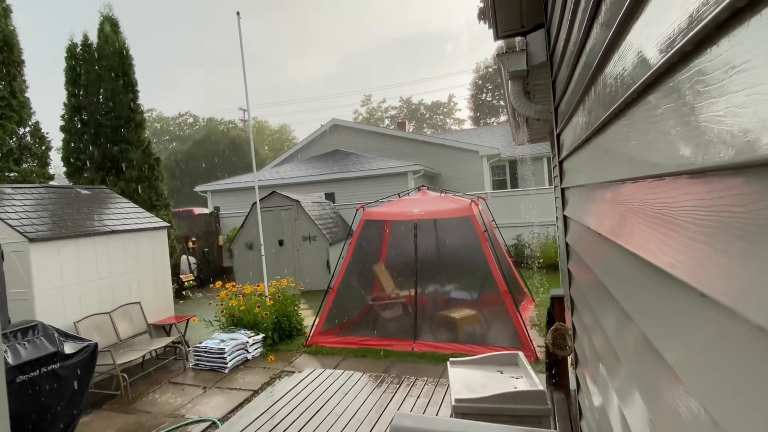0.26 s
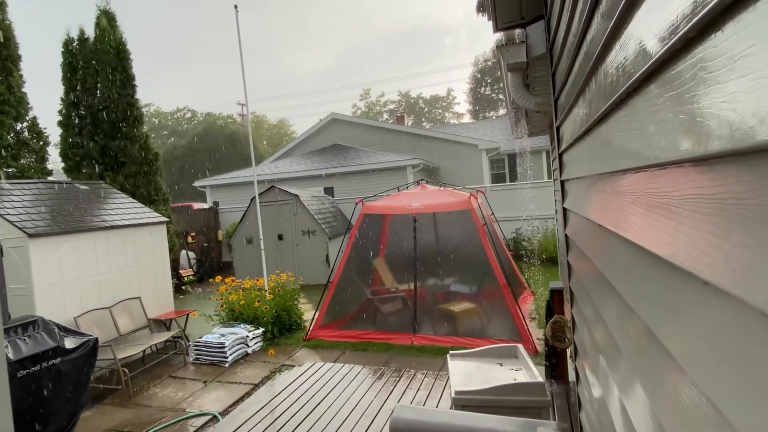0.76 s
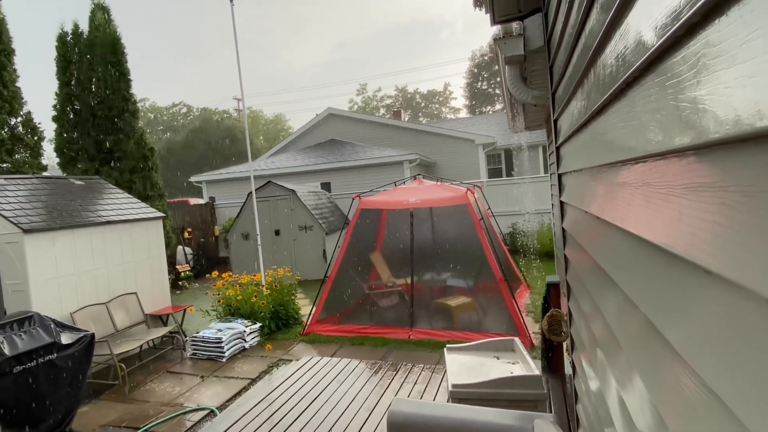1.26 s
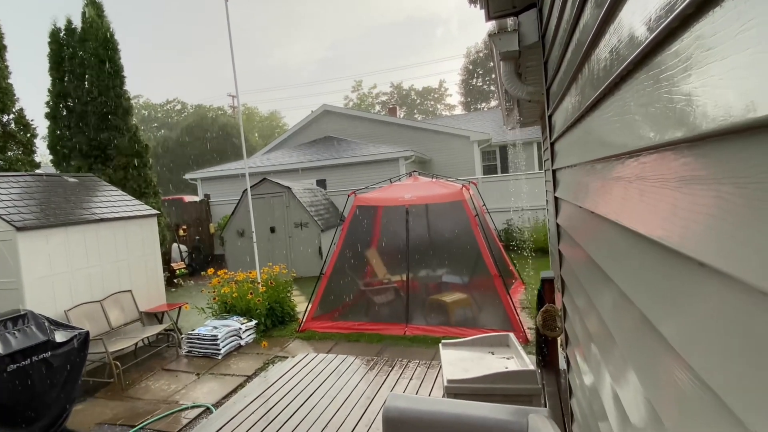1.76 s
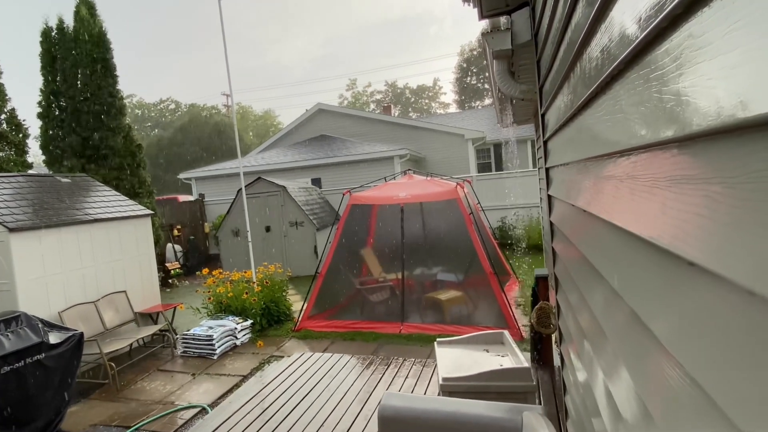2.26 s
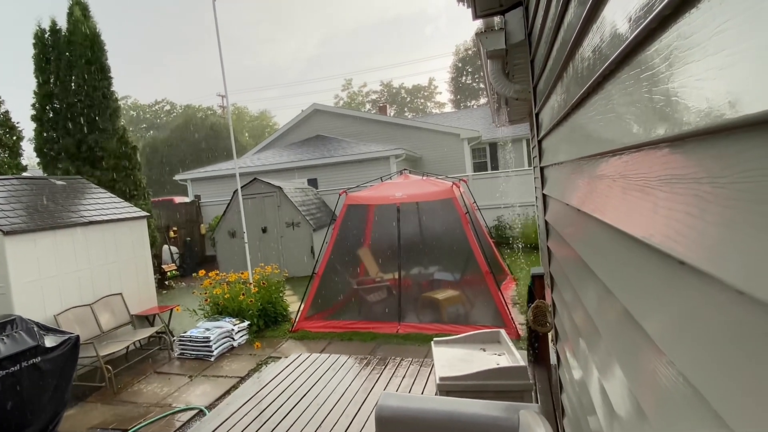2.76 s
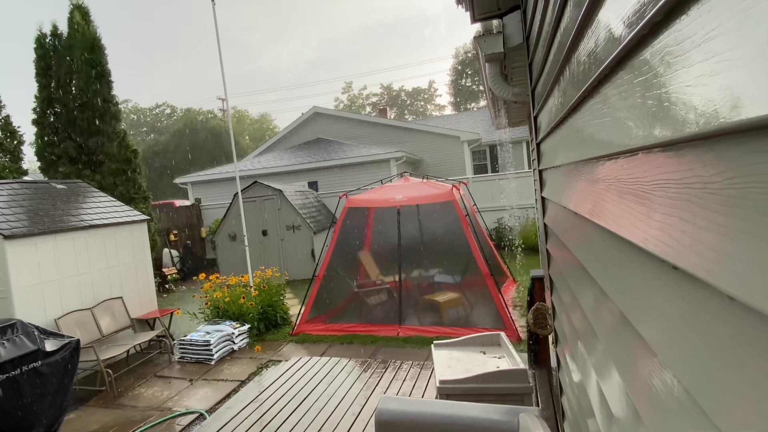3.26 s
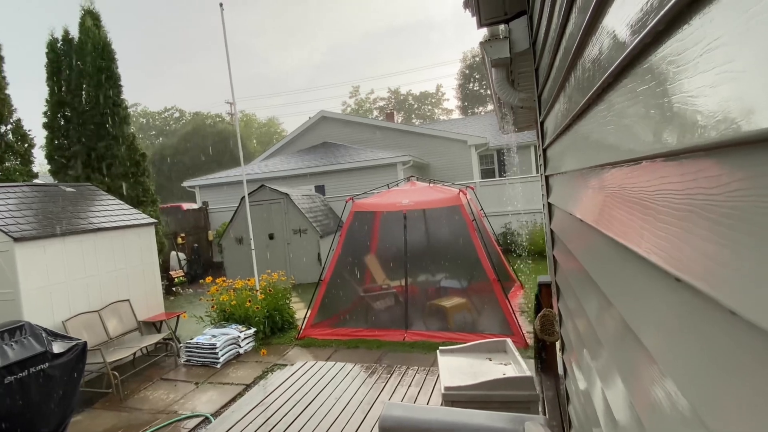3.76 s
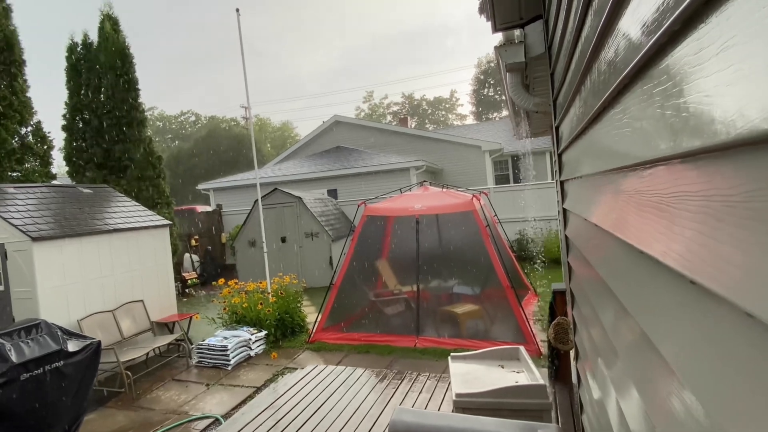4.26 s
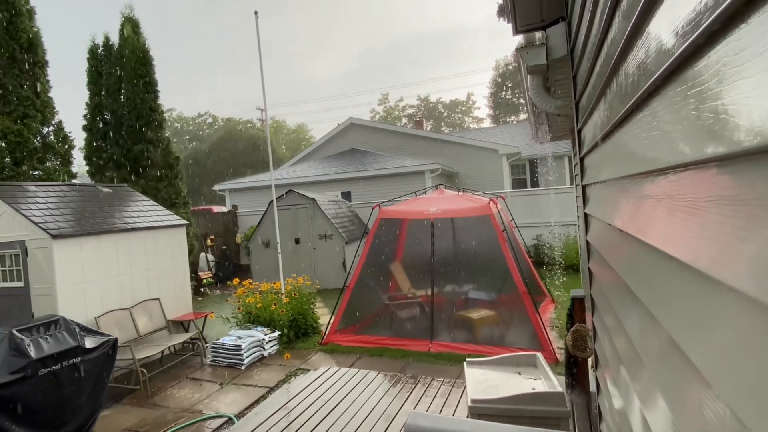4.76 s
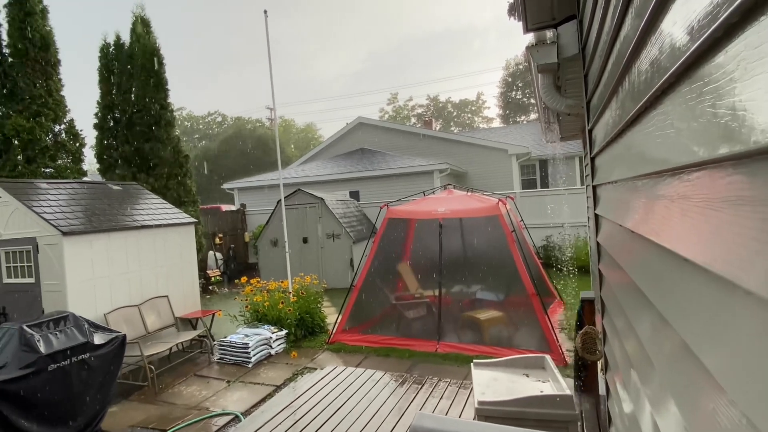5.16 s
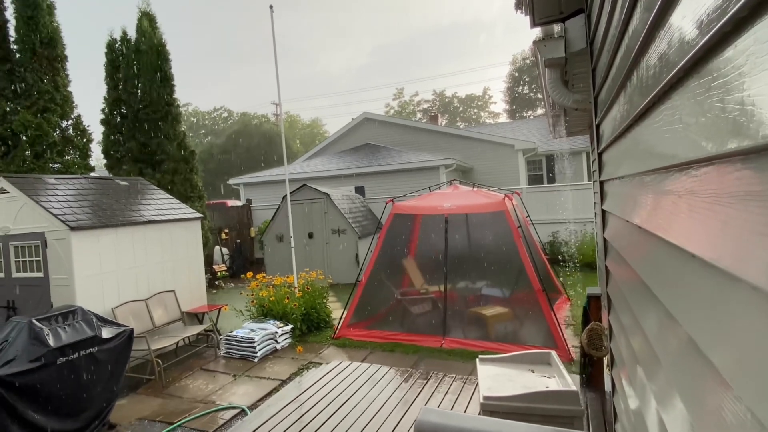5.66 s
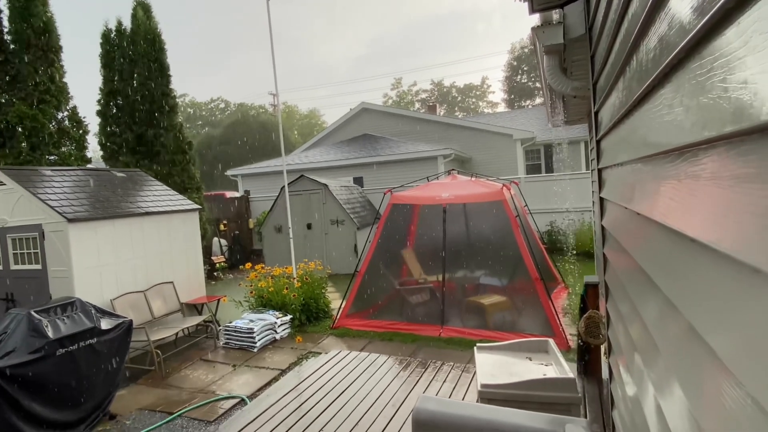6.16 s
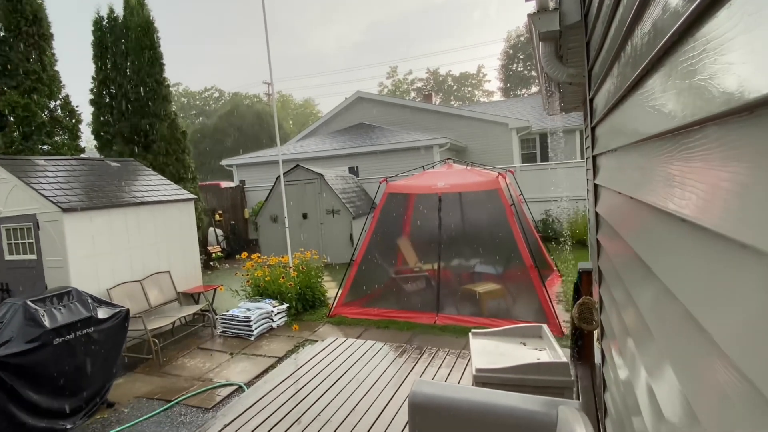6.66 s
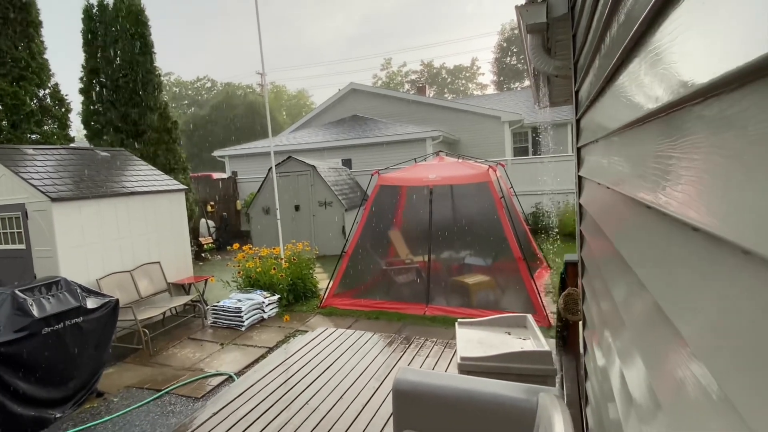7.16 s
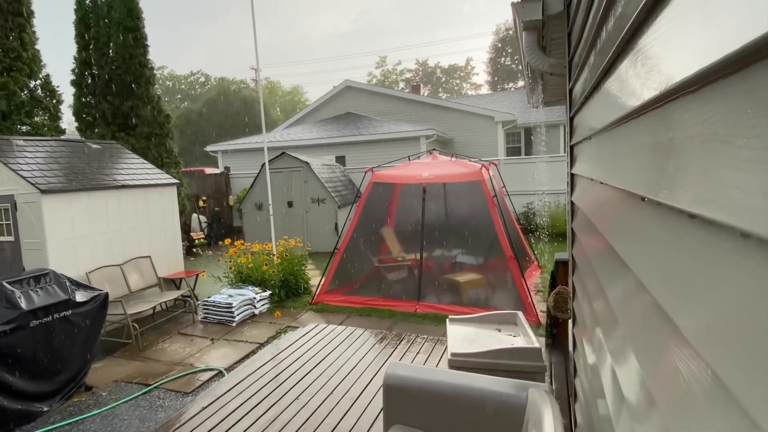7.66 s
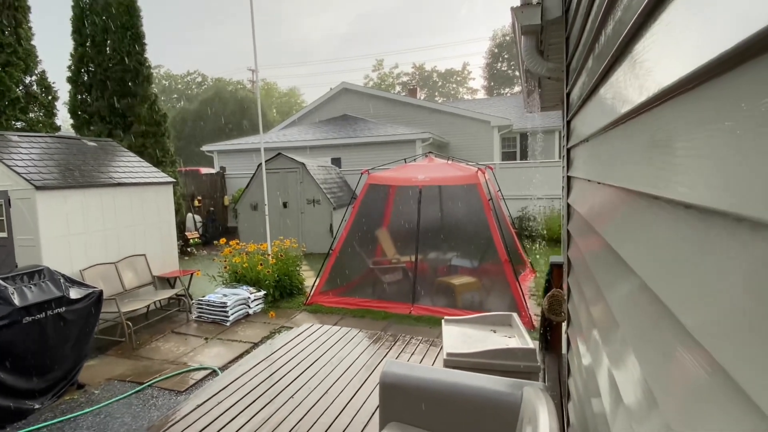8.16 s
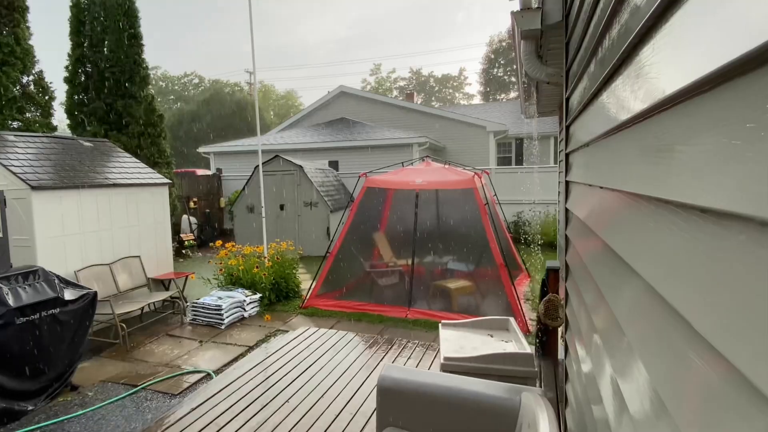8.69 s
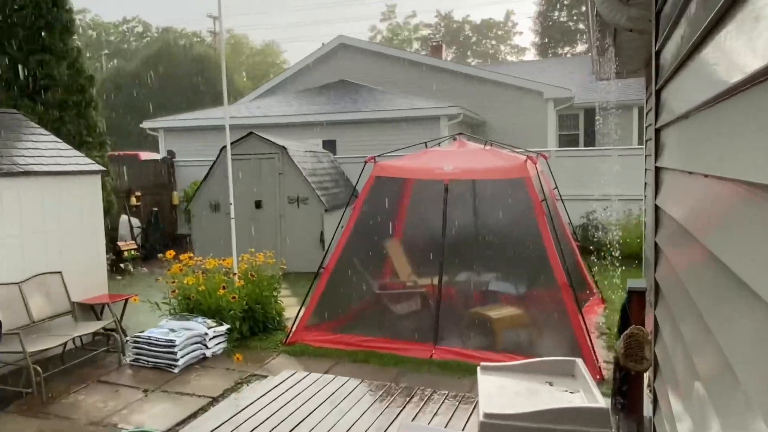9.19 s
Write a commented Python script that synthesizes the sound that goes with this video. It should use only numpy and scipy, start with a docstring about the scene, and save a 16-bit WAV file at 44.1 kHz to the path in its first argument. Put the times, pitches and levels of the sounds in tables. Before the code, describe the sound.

Bright steady rain with a low fan hum; a door latch clacks, the door opens to full wide rain, then the sound abruptly thins.

```python
"""Heavy rain from two microphones laid over each other: one in a yard, one in stereo in a room.
Throughout: bright mono rain (band noise with splash flares), faint tones and, panned, the cracks of big drops.
From the start, in the room: a fan (beating sines over air noise) and hand rumble. A door is gripped
(ringing blows, low thuds), unlatched near 2.4 s and swung open from 2.9 to 4 s onto wide, full rain.
At 7.2 s the room sound is cut off abruptly; yard rain and big drops go on."""
import sys
import numpy as np
from scipy import signal
from scipy.fft import rfft, irfft, next_fast_len
from scipy.io import wavfile
from scipy.ndimage import uniform_filter1d

SR = 44100
rng = np.random.default_rng(int(sys.argv[2]) if len(sys.argv) > 2 else 0)


def wav_out(sig):
    """Save sig, one row per channel (or a flat mono array), as 16-bit PCM at SR to the path in sys.argv[1]."""
    wavfile.write(sys.argv[1], SR, np.round(np.clip(np.atleast_2d(sig).T, -1, 1) * 32767).astype(np.int16))


N = 415863
T_S = np.arange(N) / SR
SWING_START_S, SWING_END_S = 2.925, 3.97


def undb(db):
    """Decibels to an amplitude factor."""
    return 10 ** (np.asarray(db) / 20)


def curve(rows):
    """Interpolates (t/s, level/dB) rows to one level a sample."""
    time_s, level_db = np.transpose(rows)
    return np.interp(T_S, time_s, level_db)


def colour(x, points, peaks=()):
    """Shapes flat sound to a spectrum, linear in log f, plus resonances; rms 1."""
    size = next_fast_len(N)
    f_hz = np.fft.rfftfreq(size, 1 / SR)
    point_hz, point_db = np.transpose(points)
    shape_db = np.interp(np.log(f_hz + 1), np.log(point_hz), point_db)
    for mid_hz, width_hz, peak_db in peaks:
        shape_db = shape_db + peak_db * 2 ** -(2 * (f_hz - mid_hz) / width_hz) ** 2
    y = irfft(rfft(x, size) * undb(shape_db), size)[:N]
    return y / y.std()


def walk(rate_hz):
    """Random levels held 1 / rate_hz and slewed twice; spread near 1."""
    hold = int(SR / rate_hz)
    steps = np.repeat(rng.standard_normal(N // hold + 1), hold)
    smooth = uniform_filter1d(uniform_filter1d(steps, hold), hold)
    return np.sqrt(2) * smooth[:N]


def add(out, x, start_s, pan_db):
    """Mixes in a short sound; pan_db is left minus right."""
    i = int(start_s * SR)
    out[:, i:i + x.shape[-1]] += x * undb(np.array([[pan_db], [-pan_db]]) / 2)


def patter(per_s, near_db, spread_db, splash_s, flicker_db, count):
    """Flat noise of countless far drops; nearer splashes flare up over a few neighbouring octave bands."""
    size = next_fast_len(N)
    octave = np.log2(np.fft.rfftfreq(size, 1 / SR) / 250 + 1e-9).clip(0, 6)
    noise = rfft(rng.standard_normal((count, size)))
    when, big, place = rng.random((4000, 3)).T
    heard = np.arange(4000) < per_s * N / SR
    splash = heard * undb(near_db + spread_db * big ** 2)
    fall = np.exp(-1 / (splash_s * SR))
    out = 0
    for k in range(7):
        # most splashes sit in the treble: small drops
        share = np.exp(-((k - 6.3 + 3.2 * place ** 0.59) / 1.2) ** 2)
        onsets = np.bincount((when * N).astype(int), splash * share, N)
        flare = signal.lfilter([1], [1, -fall], onsets)
        swell = undb(flicker_db * k / 6 * walk(14)) + flare  # flicker grows from none in the lowest band
        band = irfft(noise * (1 - np.abs(octave - k)).clip(0), size)[:, :N]
        out = out + swell * band
    return out


def gap():
    """How far the door stands open, 0 to 1, linear in time."""
    return np.interp(T_S, (SWING_START_S, SWING_END_S), (0, 1))


def fan():
    """Motor lines that throb by beating with close neighbours and waver, over a rumble of air."""
    # air spectrum, common to both ears: f/Hz, relative density/dB
    air_mid = [(20, -48), (40, -10.5), (60, -4.5), (80, -3.5), (100, -7), (180, -6.5), (230, -10.5),
               (300, -12.5), (340, -20), (800, -22.5), (2000, -25), (5000, -75)]
    # air spectrum, opposite in the ears: f/Hz, relative density/dB
    air_side = [(18, -41), (30, -15), (62, -10), (209, -17), (359, -5), (433, -15), (475, -11),
                (848, -16.5), (1760, -13), (2600, -27), (3380, -73), (5720, -120)]
    # air, common part: t/s, rms level/dB
    air_level = [(0, -47), (2, -48.5), (3.4, -44), (7.3, -50.5)]
    # motor lines: f/Hz, rms level door shut/dB, neighbour offset/Hz, neighbour re line/dB,
    # both in step at t/s, change with door open/dB
    motor_lines = [(58.6, -52, .55, -1, 1.25, -4), (118.32, -52, 1.62, -2, .34, -2.5),
                   (178.76, -49.5, .89, -7, .47, -6)]
    mid = colour(rng.standard_normal(N), air_mid)
    side = undb(-5.5) * colour(rng.standard_normal(N), air_side)
    out = undb(curve(air_level)) * np.array([mid + side, mid - side])
    for hz, db, beat_hz, near_db, step_s, open_db in motor_lines:
        phase = 2 * np.pi * (hz * T_S + rng.random())
        neighbour = undb(near_db) * np.sin(phase + 2 * np.pi * beat_hz * (T_S - step_s))
        level_db = db + open_db * gap() + 0.6 * walk(6.5)
        out = out + np.sqrt(2) * undb(level_db) * (np.sin(phase) + neighbour)
    return out


def hand():
    """The hand shifts on the housing: swells of 45-130 Hz rumble, unrelated left and right."""
    # shifts: centre t/s, rms level at the height/dB, length between 1/e points/s
    shifts = [(0.083, -45, 0.2), (0.307, -46, 0.081), (0.468, -50, 0.13), (.95, -57, .3),
              (1.337, -45, 0.093), (2.45, -43, 0.15), (3.08, -56, 0.43), (3.78, -43, 0.26),
              (4.15, -53, .12), (4.5, -53, .12)]
    band = signal.butter(2, [45, 130], "bandpass", fs=SR, output="sos")
    rumble = signal.sosfilt(band, rng.standard_normal((2, N)))
    swell = sum(undb(db) * np.exp(-(2 * (T_S - s) / length_s) ** 2) for s, db, length_s in shifts)
    return rumble / rumble.std() * swell


def yard():
    """Thin, bright rain coloured by the microphone housing, and faint tones; the same in both ears."""
    # rain spectrum ahead of the housing: f/Hz, relative density/dB
    yard_spectrum = [(30, -50), (55, -15), (90, -23), (160, -14.5), (430, -16), (780, -17.5), (1500, -14.5),
                     (1850, -10), (2500, -5.5), (4500, -4.5), (6100, -12), (8800, -7.5), (9600, -18),
                     (11500, -22.5), (15800, -28)]
    # rain: t/s, rms level/dB
    yard_level = [(0, -43.5), (3, -43.5), (7.2, -40), (7.6, -42.5), (9.43, -42.5)]
    # housing resonances: f/Hz, width/Hz, gain/dB (a dip is negative)
    housing = [(585, 210, 6), (1036, 376, 13), (3250, 650, 5), (4010, 230, -2.5), (6780, 450, -8.5),
               (7520, 940, 4), (8460, 490, 3.5), (10410, 420, 7), (12800, 800, 7.5), (14250, 250, -8),
               (14600, 260, 0)]
    # faint steady tones: f/Hz, rms level/dB
    yard_tones = [(59.2, -74), (107.7, -79)]
    far_and_near = patter(60, -10.5, 13.0, 0.0037, 0.69, count=1)[0]
    rain = colour(far_and_near, yard_spectrum, housing) * undb(curve(yard_level))
    tones = sum(np.sqrt(2) * undb(db) * np.sin(2 * np.pi * hz * T_S) for hz, db in yard_tones)
    return rain + tones


def door():
    """Short rattles ring the latch metal; the leaf swells into low decaying thuds in its frame."""
    # latch and handle modes: f/Hz, level/dB ahead of the blow's tilt, t60/s
    latch_modes = [(298, -10, 0.034), (430, 0, 0.026), (1130, 1, 0.022), (1420, 9.5, 0.0083),
                   (1800, 8.5, 0.0084), (2350, 8, 0.017), (2700, 5, 0.017), (3020, 7, 0.0092),
                   (4080, -1.5, 0.011), (5210, -3, 0.0094), (6840, 6, 0.0079), (7750, 3, 0.0016),
                   (10800, -24, 0.011)]
    # blows: t/s, peak level ahead of panning/dB, brightness/(dB per octave re 2 kHz), rattle time/s
    blows = [(.272, -35.5, -15, .006), (2.213, -29.5, -10, 0.0078), (2.348, -32.5, -12, 0.0044),
             (2.396, -16, 4, 0.0006), (2.397, -21.5, -2, .0035), (2.408, -12, 6, 0.0055),
             (2.424, -18, -3, 0.0055), (2.443, -16, 0, 0.0057), (2.46, -28, -5, 0.012),
             (3.042, -21, -1, 0.0028), (3.049, -27, -3, 0.012)]
    # leaf thuds: t/s, peak level ahead of panning/dB, f/Hz
    thuds = [(.028, -35.5, 272), (0.275, -43, 255), (2.041, -32.5, 129), (2.217, -31.5, 132),
             (2.24, -24.5, 95.6), (2.362, -32, 88), (2.391, -19, 103.7), (2.399, -26.5, 227),
             (2.41, -22, 57.6), (2.433, -39, 195), (3.047, -33, 220)]
    rise_cycles, t60_cycles = 0.38, 13.7  # thud
    out, t = np.zeros((2, N)), np.arange(8000) / SR
    for s, db, bright_db, rattle_s in blows:
        ring = np.zeros(8000)
        for hz, mode_db, t60_s in latch_modes:
            mode_gain = undb(mode_db + bright_db * np.log2(hz / 2000))
            ring += mode_gain * np.sin(2 * np.pi * hz * t) * 1000 ** (-t / t60_s)
        # bare contact noise: 17 dB at a 1 ms rattle; longer rattles ring more
        crack_db = 17 - 5.5 * np.log2(rattle_s * 1000)
        contact = np.clip(.5 - bright_db / 9, 0, .9)  # dull blows touch longer
        ring[:8] += undb(crack_db) * contact ** np.arange(8)
        rattle = rng.standard_normal((3, 8000)) * t * np.exp(-t / rattle_s)
        # one shared rattle, one for each ear
        ears = rattle[0] + 1.9 * rattle[1:]
        hit = signal.fftconvolve(ears, ring[None], axes=1)[:, :8000]
        add(out, undb(db) * hit / np.abs(hit).max(), s, pan_db=2.2)
    for s, db, hz in thuds:
        rise = (1 - np.exp(-hz * t / rise_cycles)) ** 2
        thud = rise * 1000 ** (-hz * t / t60_cycles) * np.sin(2 * np.pi * hz * t)
        add(out, undb(db) * thud / np.abs(thud).max(), s, pan_db=.6)
    return out


def drops():
    """Each big drop close by is a tick, a crack of noise and weak spray, all in its own band."""
    # big drops: t/s, peak level ahead of panning/dB, lowest f/Hz, highest f/Hz, left minus right/dB
    big_drops = [(0.092, -36, 5200, 9500, 2), (1.747, -30, 7400, 9800, 1), (1.956, -28.5, 3650, 5500, 5),
                 (2.860, -23, 3000, 10300, 0), (2.920, -25, 3500, 9400, -0.5), (3.511, -30, 3000, 11600, 5),
                 (3.844, -25, 2400, 4600, 13), (4.083, -31, 9300, 15500, 0), (4.092, -26, 2500, 4970, 10),
                 (4.261, -27, 6400, 12500, -2), (4.482, -34, 6600, 15500, -2), (4.5, -29, 5000, 7500, 1),
                 (4.722, -33, 7700, 15500, -4), (4.803, -33, 5200, 14800, 1), (4.828, -27, 2300, 6000, -2),
                 (4.867, -29, 2180, 4400, 12), (4.925, -30, 7800, 11900, -4), (5.023, -28, 5000, 8000, 0),
                 (5.095, -33, 3800, 9700, -3), (5.215, -27, 4100, 6370, -6), (5.537, -35, 2300, 6300, 7),
                 (5.564, -31, 4500, 5600, 0), (5.578, -26, 4300, 7500, 0), (5.638, -29, 6600, 9600, 1),
                 (5.682, -24, 3000, 12500, 4), (5.718, -31, 4100, 15500, 2), (5.843, -24, 4200, 7200, -7),
                 (6.035, -26.5, 6100, 11600, -7), (6.167, -21.5, 4200, 6560, -5),
                 (6.191, -27, 4700, 15500, -7), (6.267, -32, 9600, 15500, -1), (6.294, -24, 4700, 9700, -3),
                 (6.338, -25, 5300, 8900, -6), (6.476, -29, 6890, 9700, 0), (6.528, -32, 9100, 13500, -2),
                 (6.547, -25, 2200, 5500, 0), (6.593, -32, 9900, 13500, 0), (6.743, -30, 9600, 15300, 0),
                 (6.773, -26, 3800, 6500, 0), (6.831, -23.5, 4200, 11600, 1),
                 (6.954, -27.5, 7000, 10100, 0), (7.518, -36, 6700, 9300, 0), (7.831, -35, 4400, 9300, 0),
                 (8.225, -28, 3600, 7000, 0), (8.374, -32, 2800, 9300, 0), (8.992, -35, 3300, 9900, 0),
                 (9.183, -29.5, 7400, 9300, 0), (9.207, -25, 2490, 5130, 0), (9.258, -30, 7200, 9600, 0)]
    rise_s, crack_t60_s = .0003, .012
    spray_db, spray_t60_s, tick_db = -15, .12, 9
    out, t = np.zeros((2, N)), np.arange(2000) / SR
    spray = undb(spray_db) * 1000 ** (-t / spray_t60_s)  # droplets falling back
    tick = undb(tick_db) * (t == 0)  # first contact
    envelope = np.minimum(t / rise_s, 1) * (1000 ** (-t / crack_t60_s) + spray)
    for s, db, low_hz, high_hz, pan_db in big_drops:
        band = signal.butter(2, [low_hz, high_hz], "bandpass", fs=SR, output="sos")
        crack = signal.sosfilt(band, rng.standard_normal(2000) * envelope + tick)
        add(out, undb(db) * crack / np.abs(crack).max(), s, pan_db)
    return out


def doorway():
    """Full, wide rain, louder as a power of the gap; a narrow gap lets less treble in."""
    # rain spectrum, common to both ears: f/Hz, relative density/dB
    door_mid = [(20, -42), (53, -7.5), (150, -1.5), (310, 2.5), (400, -7.5), (570, -2), (850, -6.5),
                (1100, -5.5), (2000, -12), (3300, -21), (5500, -20), (8500, -28), (10700, -22.5),
                (13000, -31), (15500, -25.5)]
    # rain spectrum, opposite in the ears: f/Hz, relative density/dB
    door_side = [(24, -45), (214, -15), (627, 5.5), (1200, -3), (1750, -1), (2300, -6.5), (3100, -7.5),
                 (3800, -11), (5600, -10.5), (6700, -14.5), (9400, -16.5), (12000, -24.5), (14000, -16.5),
                 (15800, -35)]
    echo_s, echo_share = 0.00088, 0.42
    open_db, gap_power, side_db = -37.5, 0.45, -2
    wide_treble_db, narrow_treble_db, treble_rise_db_per_s = 3, -5.5, 0.25
    mid, side = patter(70, -8.0, 12.6, 0.0059, 1.5, count=2)
    # door frame: a short echo of the lower rain, equally strong but opposite in the ears
    low = signal.butter(1, 1600, fs=SR, output="sos")
    echo = signal.sosfiltfilt(low, np.roll(mid, int(echo_s * SR)))
    side = side - echo_share * echo
    mid, side = colour(mid, door_mid), undb(side_db) * colour(side, door_side)
    both = np.array([mid + side, mid - side])
    treble = signal.sosfilt(signal.butter(1, 4000, "highpass", fs=SR, output="sos"), both)
    since_open_s = np.maximum(T_S - SWING_END_S, 0)
    # the rain sharpens once the door is wide open
    treble_db = wide_treble_db + narrow_treble_db * (1 - gap()) + treble_rise_db_per_s * since_open_s
    return undb(open_db) * gap() ** gap_power * (both + (undb(treble_db) - 1) * treble)


def scene():
    """Yard rain and big drops all along; the room sound is cut off abruptly, within 0.08 s."""
    cut = np.interp(T_S, (7.16, 7.24), (1, 0))
    room = fan() + hand() + door() + doorway()
    return yard() + drops() + cut * room


def record(dry):
    """The recorder cuts the top: a steep low-pass at 15.85 kHz."""
    return signal.sosfilt(signal.ellip(10, .2, 80, 15850, fs=SR, output="sos"), dry)


dry = scene()
out = record(dry)
wav_out(out)
```